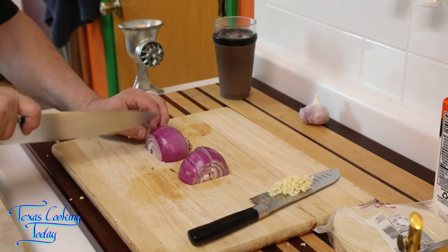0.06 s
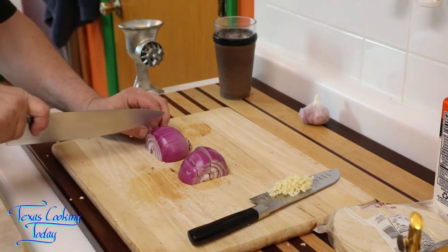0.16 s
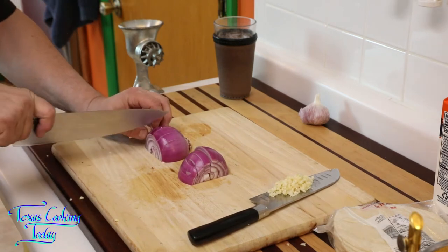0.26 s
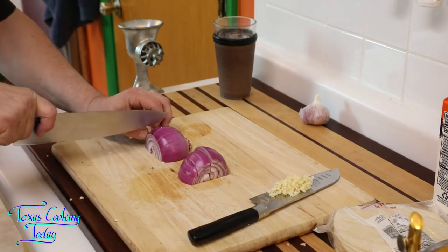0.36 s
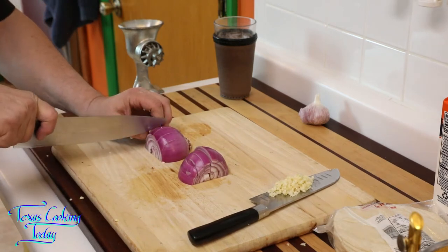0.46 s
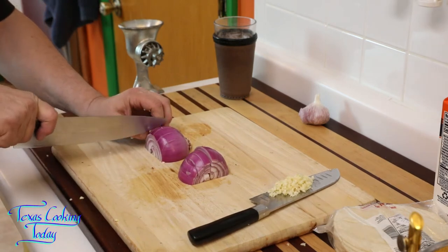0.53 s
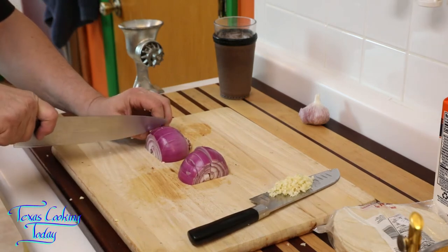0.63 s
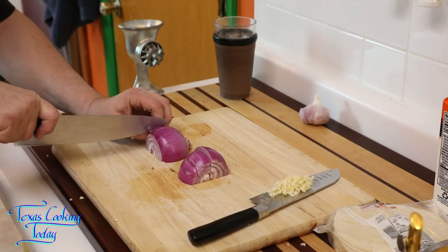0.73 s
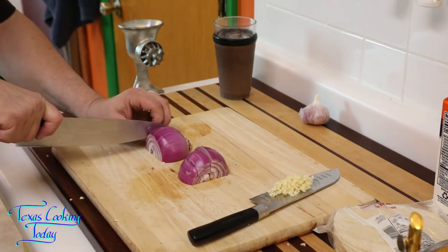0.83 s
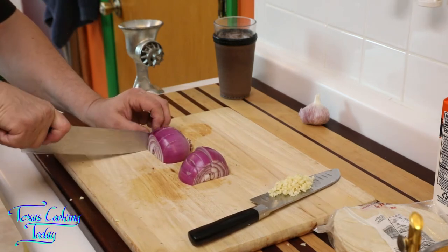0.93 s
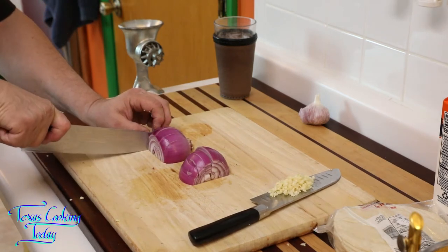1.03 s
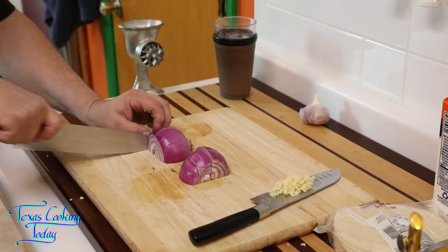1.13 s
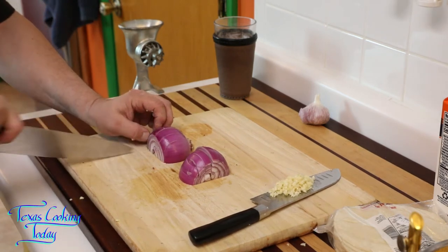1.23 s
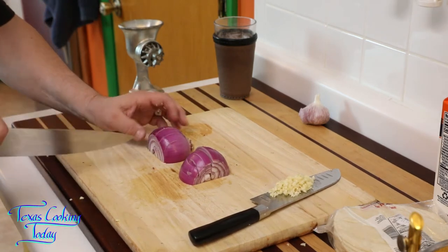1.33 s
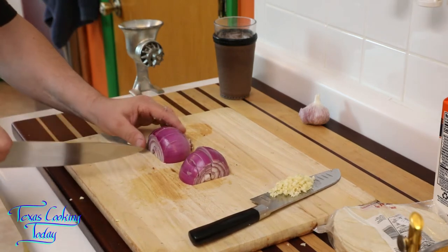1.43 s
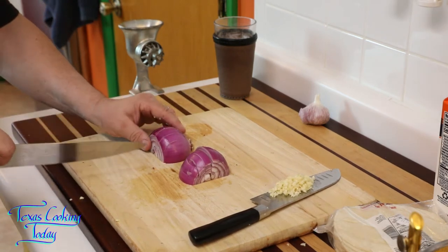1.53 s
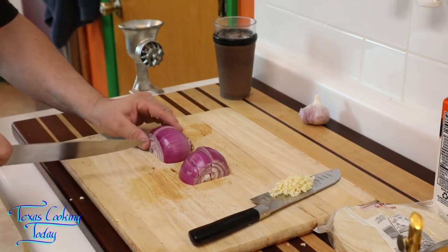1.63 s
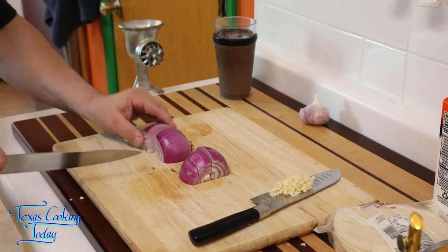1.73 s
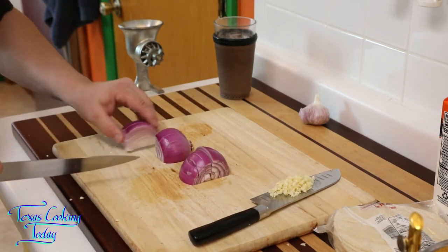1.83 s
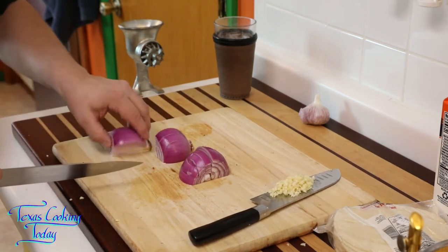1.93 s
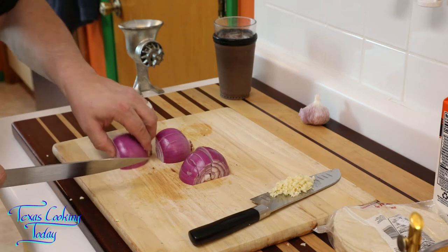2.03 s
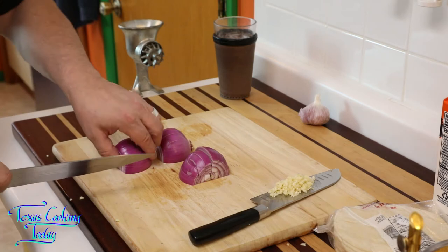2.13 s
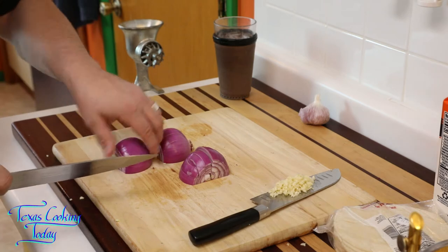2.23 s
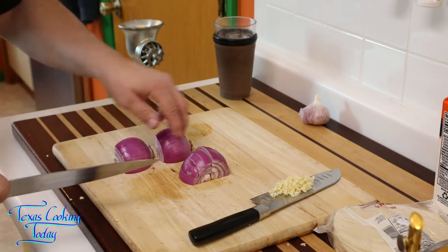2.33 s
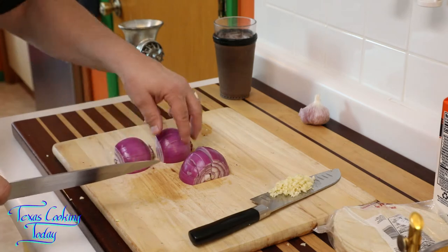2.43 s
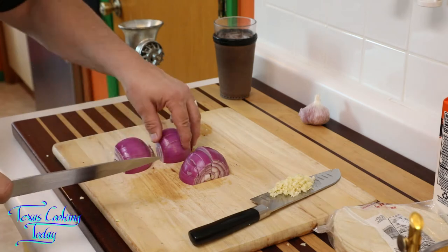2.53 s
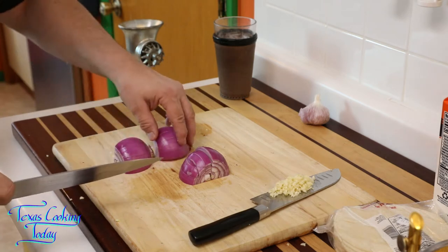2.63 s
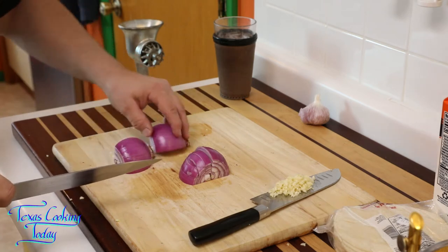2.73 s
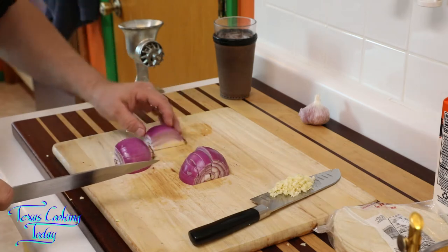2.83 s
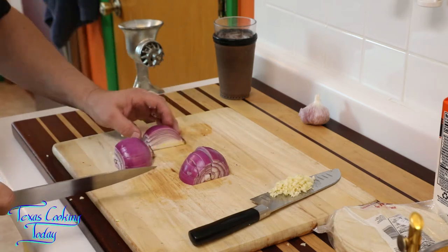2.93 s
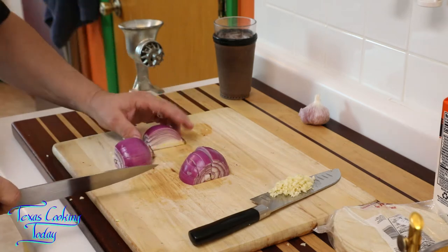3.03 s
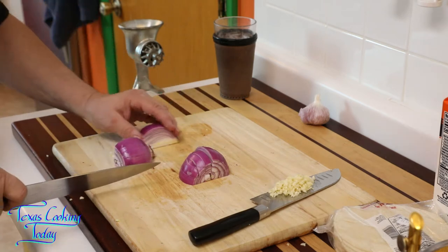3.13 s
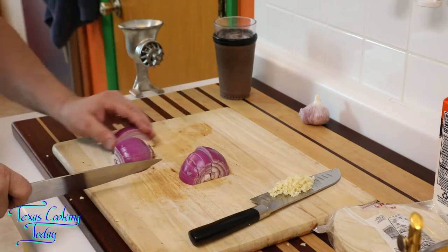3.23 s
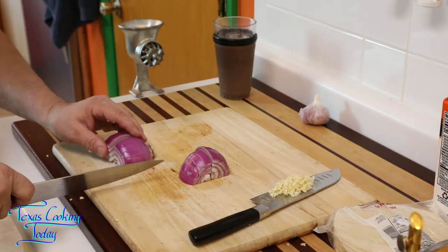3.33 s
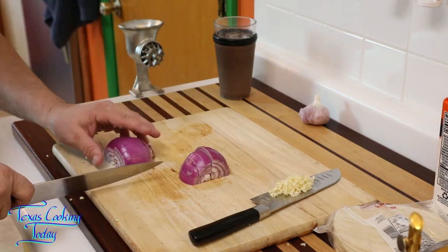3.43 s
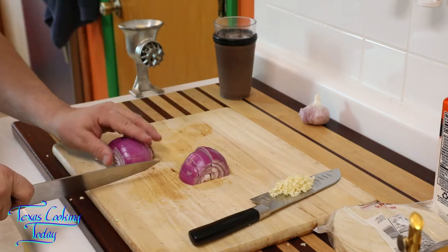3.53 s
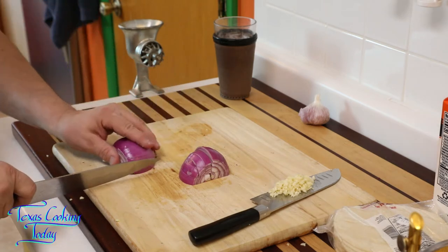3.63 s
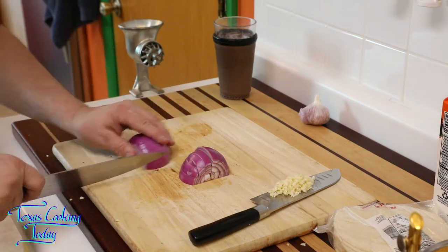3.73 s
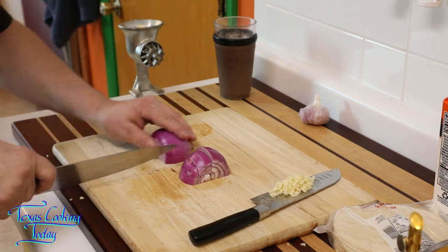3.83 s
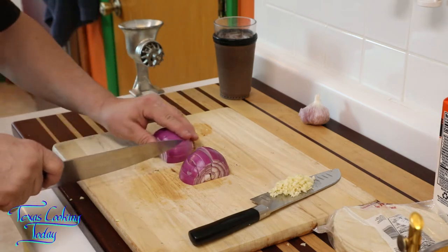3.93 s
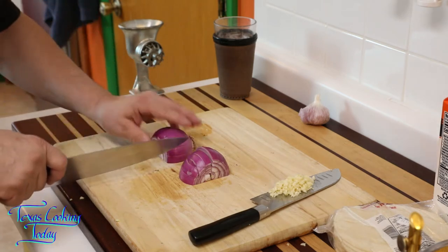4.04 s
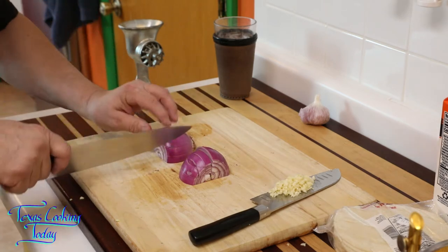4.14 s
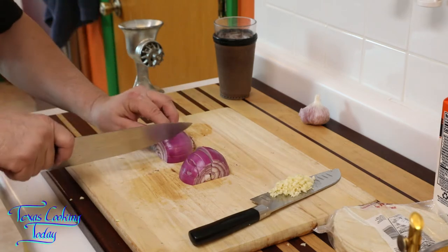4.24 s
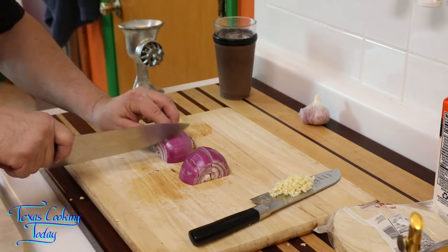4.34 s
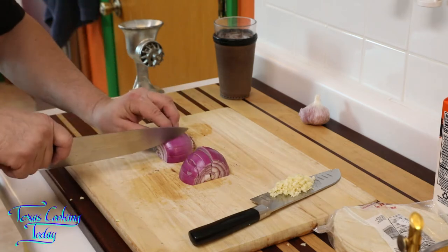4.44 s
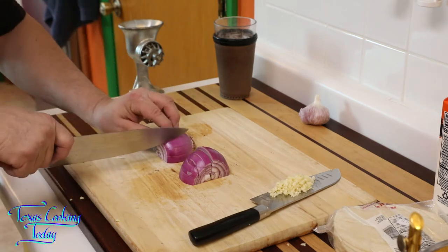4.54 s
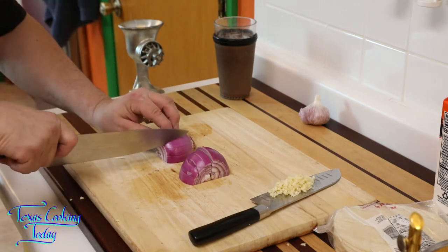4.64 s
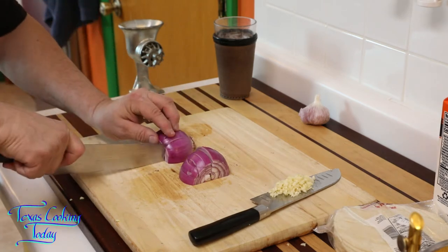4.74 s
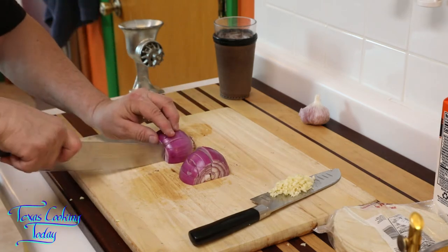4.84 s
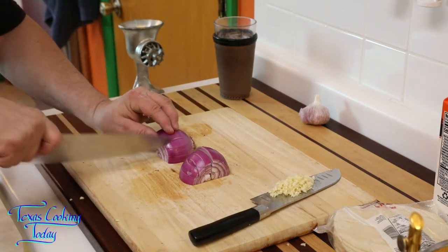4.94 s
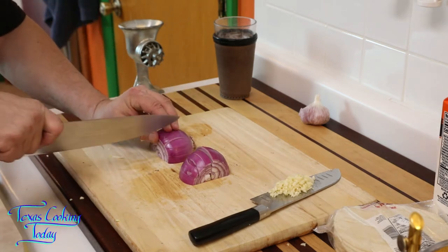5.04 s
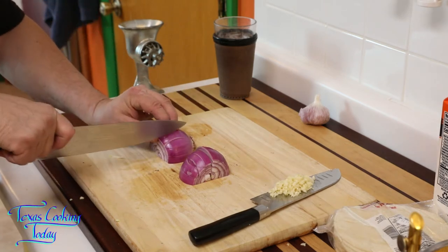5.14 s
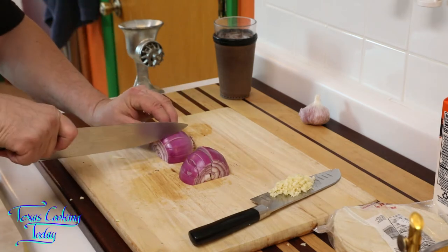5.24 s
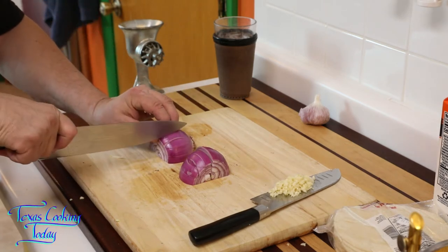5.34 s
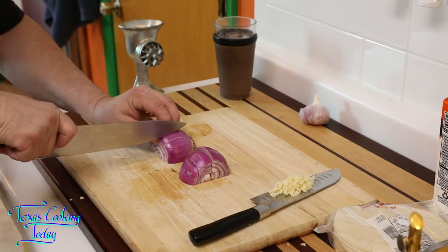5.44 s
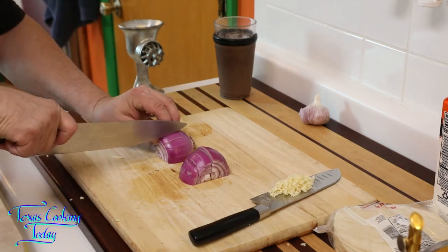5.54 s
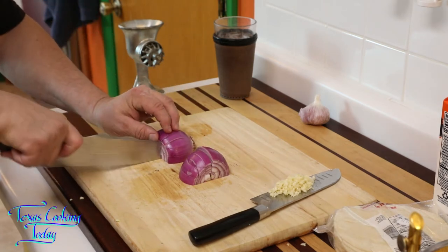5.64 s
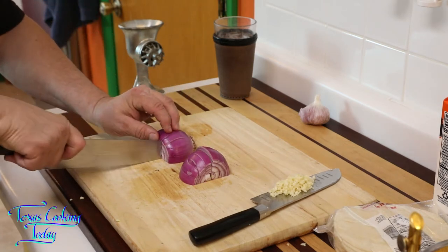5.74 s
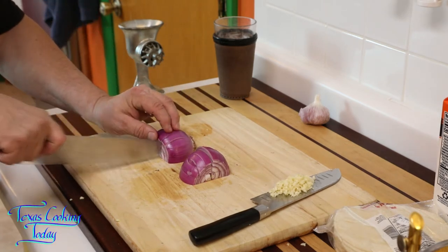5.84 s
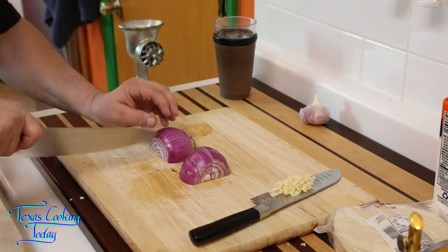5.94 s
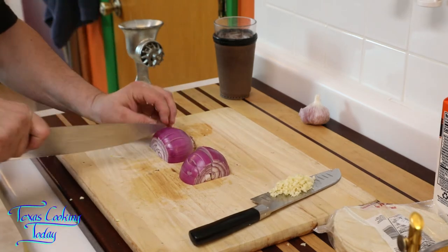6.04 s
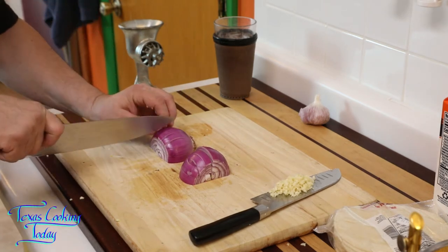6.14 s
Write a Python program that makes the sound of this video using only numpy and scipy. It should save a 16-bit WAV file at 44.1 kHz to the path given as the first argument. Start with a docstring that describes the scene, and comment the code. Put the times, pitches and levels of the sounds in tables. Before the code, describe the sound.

Three loud overloaded chops through onion onto a wooden cutting board, with lighter knocks, faint blade pings and soft sliding over low room rumble.

```python
"""In a tiled kitchen, a chef's knife crunches down through onion halves and knocks on a wooden board.
Crunches are bursts of noise grains over the onion's resonances; knocks are short pushes on ringing modes.
Between cuts the steel edge pings, pieces are set down and slid about as shaped noise, over a low rumble.
Sparse echoes give the room its tail. The small microphone overloads on the three full chops."""
import sys
import numpy as np
from scipy import signal
from scipy.io import wavfile
from scipy.ndimage import uniform_filter1d

SR = 44100
rng = np.random.default_rng(int(sys.argv[2]) if len(sys.argv) > 2 else 0)


def dump_mix(stems):
    """Bounce the given channels to the path in sys.argv[1] as a 16-bit WAV at rate SR."""
    frames = np.atleast_2d(stems).T  # one column per channel
    limited = np.clip(frames, -1, 1)  # hard clip at full scale
    pcm = np.round(limited * 32767).astype(np.int16)
    wavfile.write(sys.argv[1], SR, pcm)


def convert_level_to_amplitude(level_db):
    """Map a level in decibels to its linear amplitude factor."""
    exponent = np.asarray(level_db, float) / 20
    return 10 ** exponent


N = 272317  # length [samples]

# Room noise spectrum: (frequency [Hz], level [dB])
RUMBLE_SPECTRUM = [(15, -3), (25, -2.5), (50, 7.5), (100, -0.5), (160, -0.5), (310, -0.5), (500, -7),
                   (1000, -13), (2000, -19), (3300, -21.5), (4000, -26.5), (8000, -34.5), (13000, -46),
                   (16000, -59)]
# Swell of its low part: (time [s], level [dB])
RUMBLE_SWELL = [(0, -49.5), (.55, -59.5), (1.3, -49.5), (2.45, -55.5), (3.7, -52), (4.4, -55.5),
                (5.2, -52.5), (6.17, -55.5)]
HISS_DB = -62.5  # sets the steady treble

# The edge tears through a run of onion layers:
# (start [s], length [s], crackle level [dB], flesh against crackle [dB], growth [dB per layer])
TEARS = [(.001, .005, -36.5, 2, 0), (.040, .015, -35.5, -21, 0), (.802, .016, -32.5, -8.5, -0.5),
         (.868, .005, -26, -2, 0), (.8798, .005, -28.5, 6, 0), (.913, .04, -33.5, 1, 3),
         (4.669, .005, -28.5, 10, 0), (4.691, .005, -32.5, 0.5, 0), (4.709, .005, -46, 10.5, 0),
         (4.737, .005, -30.5, -4.5, 0), (4.7435, .024, -23, 10, -4), (5.607, .02, -26, 2.5, -4.5),
         (5.650, .005, -19, 4, 0), (5.657, .022, -23, 9.5, 1), (5.692, .005, -28, 1.5, 0)]
# Cells bursting, crackle spectrum: (frequency [Hz], level [dB])
CRACKLE_SPECTRUM = [(600, -28.5), (1200, -7.5), (2000, 1), (2700, 3), (3600, -7), (4300, -11), (5300, -9),
                    (7500, -18), (11000, -29), (15500, -34)]
# Resonances of the onion's body: (frequency [Hz], width [Hz], level [dB])
FLESH_MODES = [(587, 140, 1), (866, 310, 6), (355, 86, -17)]
LAYER_GAP_S, LAYER_JITTER_S = 0.011, 0.0012
LAYER_S, LAYER_SPREAD_DB = 0.0062, 5.97  # fade of each burst, level spread between layers
PRESS_DB, PRESS_MS = -4.5, 1.1  # each layer's jolt passes down into the board

# Room decay: (frequency [Hz], t60 [s])
KITCHEN_DECAY = [(100, 0.33), (260, 0.43), (700, 0.5), (1840, 0.52), (4850, 0.46), (7500, 0.38),
                 (10500, 0.26), (14000, 0.14)]
# Tone of the room tail: (frequency [Hz], level [dB])
KITCHEN_COLOUR = [(100, -2), (500, 0), (3000, 0), (6000, 0.5), (12000, 1)]

# Blows on the board, by the edge (short contact) or a piece of onion (long):
# (time [s], click level [dB], contact time [ms], chatter fade [s])
KNOCKS = [(.0086, -11, 0.16, 0.0065), (0.045, -21, 0.2, 0.001), (0.1261, -9, 0.12, 0.0085),
          (.1645, -7.5, 0.14, 0.003), (0.201, -17, .17, .003), (0.489, -43, .45, 0.0063),
          (.841, -14.5, 0.14, 0.0073), (0.9579, 5, .16, 0.011), (1.289, -11, 0.14, 0.0044),
          (2.041, -19.5, .15, 0.004), (2.101, -27.5, 0.18, .003), (2.2, -32, 0.34, 0.0012),
          (2.91, -19, 0.15, 0.0057), (2.997, -35, 0.33, 0.0083), (3.16, -42.5, 0.54, 0.0069),
          (3.468, -37, .13, 0.0059), (3.492, -27.5, 0.2, 0.001), (3.603, -26.5, 0.49, 0.014),
          (3.639, -32, 0.55, .012), (4.048, -33.5, 0.308, 0.0025), (4.771, 5.5, 0.19, .012),
          (5.259, -41, 0.87, 0.0073), (5.532, -28.5, 0.27, 0.011), (5.6966, 3.5, 0.21, 0.016),
          (5.905, -9.5, 0.15, 0.0037), (5.941, -17, 0.17, 0.006)]
# Ringing modes of board and counter: (frequency [Hz], level [dB], t60 [s])
BOARD_MODES = [(144, -14.5, 0.1), (351.3, -9.5, 0.19), (470, -9.5, 0.048), (569, 1.5, 0.02),
               (671, 2, 0.047), (719, 4.5, 0.019), (910, -0.5, 0.018), (1146, 0, 0.03), (1400, -9.5, 0.024),
               (1630, -10, 0.023), (1703, 7.5, 0.0071), (2430, -12, 0.029), (2890, -15.5, 0.0076),
               (2930, -9, .012)]
# The edge biting the wood: (frequency [Hz], level [dB])
CRACK_SPECTRUM = [(250, -50.5), (400, -26), (470, 7), (750, 1.5), (1000, -1.5), (1280, 0), (1540, 6),
                  (1850, -0.5), (2300, -6), (3200, -13.5), (4500, -24), (7000, -35), (11000, -55.5),
                  (16000, -61.5)]
# Bright scrape or snap of the edge: (frequency [Hz], level [dB])
TICK_SPECTRUM = [(800, -32.5), (1500, -1), (2800, 6), (4200, -6), (7000, -12.5), (11000, -24), (16000, -29)]
CHATTER_DB = -25
SNAP_DB, SNAP_PER_MS_DB = -22.5, -38  # a bright snap on the click, weaker for a longer contact
RING_DB, RING_PER_DB = -9.5, -0.11  # ring against click: soft blows are more ring than click
CRACK_DB, CRACK_PER_DB = -4, 1.0862  # crack against click: grows with the blow

# The edge touches onion skin or wood: (time [s], scrape level [dB], steel against scrape [dB])
TOUCHES = [(.078, -39, -10), (.486, -31.5, -6.5), (.759, -37, -8), (.790, -51, -7), (1.488, -38, -7),
           (1.999, -45.5, -29), (3.128, -45, -12), (3.229, -50, -7), (3.603, -45.5, -7.5),
           (4.036, -45.5, -12), (4.436, -47.5, 3.5), (4.477, -53.5, 1), (5.262, -54, 1.5),
           (5.315, -65, 15.5), (5.330, -55, 8.5), (5.425, -56, 0.5), (5.492, -50.5, -1.5)]
# Ringing modes of the blade: (frequency [Hz], level [dB], t60 [s])
BLADE_MODES = [(1960, -7, .03), (2320, -10, .03), (2520, -1, .04), (3060, -3, .035), (3560, -3, .05),
               (4970, -15, .04), (6020, -17, .03), (7400, -18, .025), (9630, -20, .07), (10500, -20, .055)]
SCRAPE_S = .0055

# A cut face slides over the wood:
# (start [s], length [s], top level [dB], share of the length spent speeding up [0 to 1])
SLIDES = [(1.55, 0.37, -59.5, 0.79), (2.1, 0.11, -56.5, 0.34), (2.62, 0.24, -63, 0.38),
          (3.68, .18, -51, .6), (3.86, 0.092, -53, 0.45)]
# Friction spectrum: (frequency [Hz], level [dB])
SLIDE_SPECTRUM = [(240, -4.5), (500, 6), (850, -1.5), (1800, -4.5), (2500, -0.5), (2950, -6), (3500, -7.5),
                  (4190, -18), (5330, -14), (12000, -41), (16000, -76)]
SLIDE_ENDS_DB = -8
SLIDE_LURCH_DB = 2.5  # the piece grips and lets go

# Microphone bass roll-off: (frequency [Hz], level [dB])
MICROPHONE = [(20, -14), (60, -6), (110, 0), (20000, 0)]


def peaked(x):
    """Scales to peak 1."""
    return x / (abs(x).max() + 1e-12)


def evened(x):
    """Scales to rms 1."""
    return x / np.sqrt(np.mean(x ** 2) + 1e-20)


def read(points, hz):
    """Reads a curve along a log frequency axis."""
    f, value = np.transpose(points)
    return np.interp(np.log(hz + 1), np.log(f + 1), value)


def coloured(x, points):
    """Minimum-phase filter with the given spectrum, so nothing sounds ahead of its onset."""
    level_db = np.maximum(read(points, abs(np.fft.fftfreq(4096, 1 / SR))), -100)
    log_gain = np.log(convert_level_to_amplitude(level_db))
    taps = np.fft.ifft(np.exp(np.conj(signal.hilbert(log_gain)))).real[:2048]
    return signal.oaconvolve(x, taps)[:len(x)]


def add(mix, s, sound):
    """Mixes a sound in at s seconds."""
    part = mix[round(s * SR):][:len(sound)]
    part += sound[:len(part)]


def ring(modes, spread_db):
    """Dying modes; each blow lands elsewhere and weights them a little differently."""
    t = np.arange(SR // 4)[:, None] / SR
    hz, db, t60 = np.transpose(modes)
    db = db + spread_db * rng.standard_normal(len(hz))
    side = (-1) ** np.arange(len(hz))  # neighbouring modes swing opposite ways
    return (side * convert_level_to_amplitude(db - 60 * t / t60) * np.sin(2 * np.pi * hz * t)).sum(1)


def grit(seconds, lumpy_db):
    """A burst of tiny uneven slips that starts at once and dies away."""
    t = np.arange(SR // 8) / SR
    lumps_db = lumpy_db * rng.exponential(1, len(t)).clip(0, 5)
    slips = rng.standard_normal(len(t)) * convert_level_to_amplitude(lumps_db)
    return slips * np.exp(-(t / max(seconds, 1e-4)) ** 2)


def rumble():
    """Patchy room noise whose low part swells and sinks over a steady hiss."""
    frames, hz = N // 256 + 5, np.fft.rfftfreq(1024, 1 / SR)
    real, imaginary, patches = rng.standard_normal((frames, 513, 3)).T
    patches = evened(uniform_filter1d(uniform_filter1d(patches, 10, 0), 10, 1))
    shape = convert_level_to_amplitude(read(RUMBLE_SPECTRUM, hz))
    low = np.linalg.norm(shape[(hz > 100) & (hz < 400)])
    high = np.linalg.norm(shape[hz >= 1000])
    swell_db = np.interp(np.arange(frames) * 256 / SR, *np.transpose(RUMBLE_SWELL))
    share = (1 / (1 + (hz / 2500) ** 2))[:, None]  # how far each band follows the swell
    low_db = swell_db - 20 * np.log10(low)
    high_db = HISS_DB - 20 * np.log10(high)
    field_db = share * low_db + (1 - share) * high_db + 0.84 * patches
    z = (real + 1j * imaginary) * shape[:, None] * convert_level_to_amplitude(field_db)
    return signal.istft(z, nperseg=1024, noverlap=768)[1][:N]


def crunch(db, flesh_db, seconds):
    """Cells burst in a crackle and shake the onion's hollow flesh."""
    bursts = grit(seconds, lumpy_db=6.5)
    modes = [(hz, level, 2.2 / width) for hz, width, level in FLESH_MODES]  # width to t60
    body = ring(modes, spread_db=2.5)
    flesh = signal.fftconvolve(bursts, body)[:len(bursts)]
    crackle = coloured(bursts, CRACKLE_SPECTRUM)
    return convert_level_to_amplitude(db) * (peaked(crackle) + convert_level_to_amplitude(flesh_db) * peaked(flesh))


def tear(seconds, db, flesh_db, growth_db):
    """Up to four layers give way a little unevenly, each crunching and jolting the board's modes."""
    out = np.zeros(SR // 3)
    jolt = np.exp(-((np.arange(300) - 150) / SR * 1000 / PRESS_MS) ** 2)
    thud = convert_level_to_amplitude(db + PRESS_DB) * peaked(signal.fftconvolve(ring(BOARD_MODES, spread_db=2), jolt))
    for k, (late, spread) in enumerate(rng.standard_normal((4, 2))):
        if k * LAYER_GAP_S >= seconds:
            break
        s = abs(k * LAYER_GAP_S + min(k, 1) * LAYER_JITTER_S * late)  # the first is on time
        layer = crunch(db + LAYER_SPREAD_DB * spread, flesh_db, LAYER_S)
        for sound in layer, thud:
            add(out, s, sound * convert_level_to_amplitude(k * growth_db))
    return out


def kitchen(x):
    """Sparse echoes off counter and tiles, dying band by band."""
    taps = np.zeros(SR)
    at = np.arange(220, SR - 20, 20)
    taps[at + rng.integers(0, 20, len(at))] = rng.choice([-1., 1.], len(at))
    hz, t, z = signal.stft(taps, SR, nperseg=256)
    decay_db = -60 * t / read(KITCHEN_DECAY, hz)[:, None]
    z = z * convert_level_to_amplitude(read(KITCHEN_COLOUR, hz)[:, None] + decay_db)
    tail = signal.istft(z, SR, nperseg=256)[1]
    tail = tail * (1 - np.exp(-np.arange(len(tail)) / (0.0011 * SR)))  # builds up
    return signal.fftconvolve(x, tail / np.linalg.norm(tail))[:N]


def knock(db, contact_ms, chatter_s):
    """A short push: a close click with chatter, and the board's ring; hard blows add a loud crack."""
    u = (np.arange(140) / SR * 1000 - 1.6) / np.clip(contact_ms, .05, .7)  # time in contact times
    push = np.exp(-u ** 2 / 2)
    impact = np.arange(SR // 8) == 0
    contacts = convert_level_to_amplitude(CHATTER_DB) * grit(chatter_s, lumpy_db=2) + impact
    click = peaked(np.convolve(contacts, (u ** 2 - 1) * push))  # the board's sudden acceleration
    snap = peaked(coloured(grit(0.0013, lumpy_db=5), TICK_SPECTRUM))
    add(click, .0013, convert_level_to_amplitude(SNAP_DB + SNAP_PER_MS_DB * contact_ms) * snap)
    wood = peaked(signal.fftconvolve(ring(BOARD_MODES, spread_db=3.5), push))
    wood = convert_level_to_amplitude(RING_DB + RING_PER_DB * db) * wood
    crack = peaked(coloured(grit(chatter_s, lumpy_db=6.5), CRACK_SPECTRUM))
    add(wood, .001, convert_level_to_amplitude(CRACK_DB + CRACK_PER_DB * db) * crack)
    return convert_level_to_amplitude(db) * click, convert_level_to_amplitude(db) * wood


def touch(db, steel_db):
    """A faint scrape that sets the blade's modes pinging."""
    scrape = grit(SCRAPE_S, lumpy_db=3.0)
    steel = signal.fftconvolve(scrape, ring(BLADE_MODES, spread_db=3))[:len(scrape)]
    return convert_level_to_amplitude(db) * (peaked(coloured(scrape, TICK_SPECTRUM)) + convert_level_to_amplitude(steel_db) * peaked(steel))


def slide(seconds, db, rising):
    """Wet friction noise that follows the hand's speed, up and down again, with small lurches."""
    t = np.arange(SR // 2) / SR
    top = np.clip(rising, .05, .95)
    speed_db = np.interp(t / seconds, [0, top, 1, 1.05], [SLIDE_ENDS_DB, 0, SLIDE_ENDS_DB, -80])
    rub = rng.standard_normal(len(t)) * convert_level_to_amplitude(1.55 * rng.exponential(1, len(t)))
    lurch = evened(uniform_filter1d(rng.standard_normal(len(t)), size=700))
    speed_db = speed_db + SLIDE_LURCH_DB * lurch
    return convert_level_to_amplitude(db + speed_db) * evened(coloured(rub, SLIDE_SPECTRUM))


def scene():
    """Everything on the board, its room tail and the room noise."""
    clicks, board = np.zeros((2, N))
    for s, *row in KNOCKS:
        click, wood = knock(*row)
        add(clicks, s, click)
        add(board, s, wood)
    for table, source, mix in ((TOUCHES, touch, clicks), (TEARS, tear, board), (SLIDES, slide, board)):
        for s, *row in table:
            add(mix, s, source(*row))
    room = convert_level_to_amplitude(-5.5) * kitchen(board + convert_level_to_amplitude(-11) * clicks)  # the click carries little into the room
    return (clicks + board + room + rumble())[None]


def low_pass(x):
    """Removes everything above the highest recorded frequency."""
    return signal.sosfilt(signal.butter(12, 16310, fs=SR, output="sos"), x)


def record(dry):
    """A limiter pulls the chops down and lets go gradually; remaining peaks are rounded off."""
    power = abs(uniform_filter1d(dry[0] ** 2, size=101, origin=50))
    level_db = 10 * np.log10(power + 1e-12)
    fall = np.arange(N) * 200. / SR  # recovery, 200 dB a second
    held_db = np.maximum.accumulate(level_db + fall) - fall
    over_db = np.maximum(held_db + 6.5, 0)  # threshold -6.5 dB
    limited = dry[0] / convert_level_to_amplitude(0.58 * uniform_filter1d(over_db, size=121, origin=60))
    overloaded = 1.261 * np.tanh(limited / 1.123)
    heard = coloured(overloaded, MICROPHONE)
    return low_pass(np.clip(heard, -1, 1)[None])


dry = scene()
out = record(dry)
dump_mix(out)
```